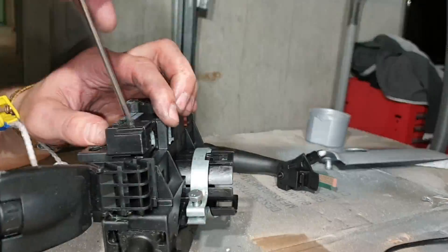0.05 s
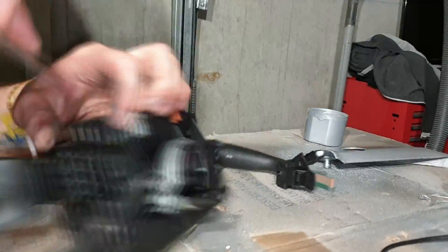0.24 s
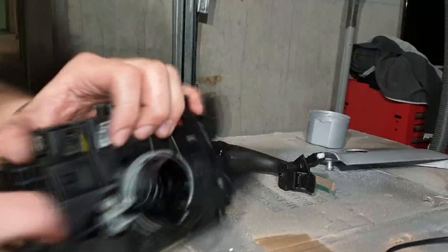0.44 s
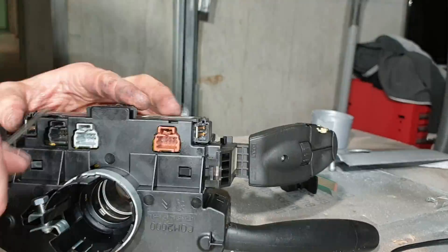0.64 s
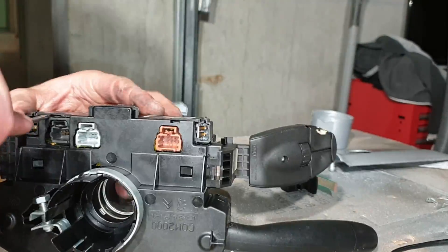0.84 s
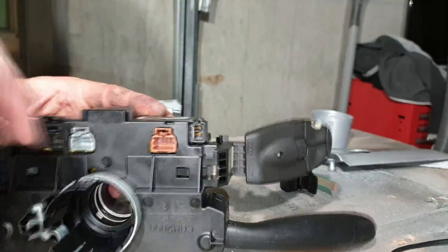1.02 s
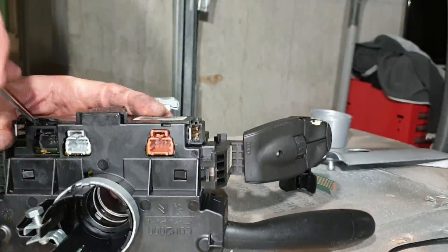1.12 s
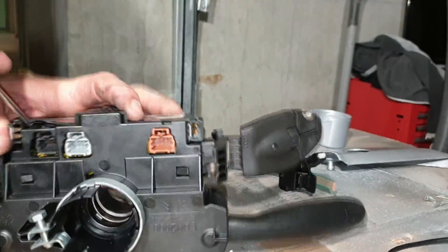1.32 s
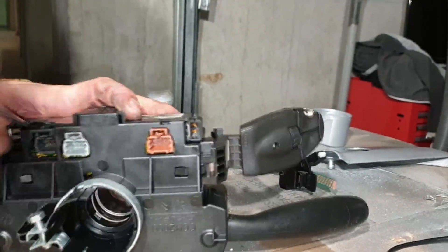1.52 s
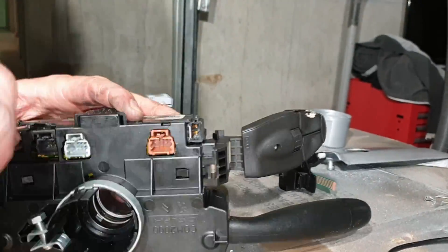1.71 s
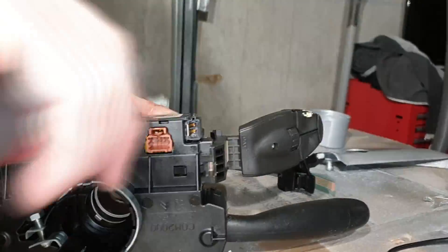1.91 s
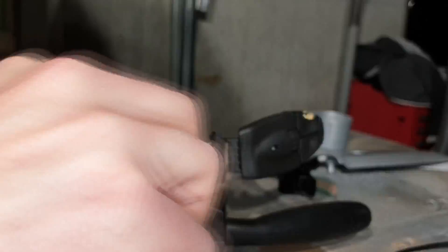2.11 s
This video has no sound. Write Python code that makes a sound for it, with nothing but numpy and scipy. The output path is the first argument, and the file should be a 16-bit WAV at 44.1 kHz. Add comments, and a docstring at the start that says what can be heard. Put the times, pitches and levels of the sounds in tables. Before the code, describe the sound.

A hollow plastic housing clicks and scrapes, first sliding across a workbench with a brief squeak, then snapping in two sharp clusters as a screwdriver pries its clips. A dull knock follows, close by in a small, quiet garage.

```python
"""In a small, quiet garage, a plastic switch housing is dragged round a workbench and pried open.
A screwdriver blade scrapes and slips, and the clips snap and make the hollow housing ring.
Sliding plastic hisses and sings, the housing bumps on the bench, and a dull knock comes near the end.
The work is close by and a little to the left of two microphones."""
import sys
import numpy as np
from scipy import signal
from scipy.fft import rfft
from scipy.io import wavfile
from scipy.ndimage import uniform_filter1d

SR = 44100
rng = np.random.default_rng(int(sys.argv[2]) if len(sys.argv) > 2 else 0)


def file_out(sig):
    """Save sig as 16-bit WAV at sys.argv[1]."""
    # one column per channel
    cols = np.atleast_2d(sig).T
    # limit, then scale
    lim = np.clip(cols, -1, 1)
    pcm = np.round(lim * 32767).astype(np.int16)
    wavfile.write(sys.argv[1], SR, pcm)


N = 94815
TOP_HZ = 16300

# The notes the housing rings at: (pitch [Hz], relative level [dB], time to fade by 60 dB [s])
HOUSING_NOTES = [(744, -12.5, 0.058), (867.4, -9, 0.052), (988.5, -11, 0.078), (1065, 5, 0.024),
                 (1203, -18.5, 0.11), (1826, -9.5, 0.049), (2080, -18, 0.087), (2440, 4, 0.0049),
                 (2720, -25.5, 0.15), (3070, -15, 0.065), (3340, -13.5, 0.073), (4970, 0, 0.021),
                 (7020, 9.5, 0.013)]
# Borders between a click's thud, body, snap and crack, low to high: (frequency [Hz])
CLICK_BORDERS = [697, 1797, 3600]
def click(body_db, snap_db, crack_db, thud_db):
    """One contact: a sharp crack, a short rattle and the ring of the hollow housing."""
    t = np.arange(SR // 6) / SR
    crack_s, rattle_s = 0.009, 0.082
    burst = stereo_noise(len(t)) * (gain(9 - 60 * t / crack_s) + gain(-3 - 60 * t / rattle_s))
    ring = 0
    for hz, db, fade_s in HOUSING_NOTES:
        pitch = hz * (1 + 0.0052 * rng.standard_normal())
        phase = 0.97 * rng.standard_normal((2, 1))
        ring += gain(db - 60 * t / fade_s) * np.sin(2 * np.pi * pitch * t + phase)
    # Light touches build more slowly; weak cracks are duller and ring half as much.
    rise_s = 0.003 * min(gain(-57 - max(body_db, snap_db)), 2)
    top, ring_share = (TOP_HZ, 1) if crack_db > -55 else (7500, 0.5)
    contact = (burst + ring_share * ring) * np.minimum(t / rise_s, 1)
    edges = [360, *CLICK_BORDERS, top]
    out = 0
    for k, db in enumerate([thud_db, body_db, snap_db, crack_db]):
        band_filter = signal.butter(4, edges[k:k + 2], "bandpass", fs=SR, output="sos")
        band = signal.sosfilt(band_filter, contact)
        opening_level = np.sqrt(np.mean(band[:, :SR // 100] ** 2, 1, keepdims=True))
        out += gain(db) * band / opening_level
    return gain(-7.5) * out


# Clicks, with relative levels: (time [s], body [dB], snap [dB], crack [dB], thud [dB])
CLIP_CLICKS = [(0.022, -57.5, -64, -72.5, -67), (.084, -76, -55.5, -62, -70.5),
               (0.289, -36, -40.5, -52, -62), (0.327, -33, -60, -52, -77), (0.533, -33.5, -61, -45, -73),
               (0.5812, -22, -57, -40, -66), (0.76, -56, -55, -57.5, -66), (1.0805, -38, -60, -60, -43.5),
               (1.094, -42, -36.5, -42, -59), (1.130, -40, -45.5, -52.5, -60), (1.1459, -39, -41, -58, -71),
               (1.1618, -22.5, -25.5, -31, -43), (1.1778, -32, -31, -35.5, -46),
               (1.3931, -35, -51, -61, -53), (1.437, -68, -52, -67, -64), (1.539, -56.5, -62, -67.5, -72),
               (1.629, -50.5, -59.5, -63, -65), (1.8109, -40, -41.5, -52, -60),
               (1.826, -27.5, -23.5, -48, -42.5), (1.8281, -28, -25.5, -33, -38),
               (1.856, -42.5, -54.5, -76, -60.5), (1.980, -57, -62, -61.5, -51.5),
               (1.996, -51, -53, -55.5, -53), (2.048, -60, -59, -58.5, -62),
               (2.124, -59.5, -69, -92, -67.5)]
def clips():
    """The clips snap and the housing ticks and knocks."""
    out = np.zeros((2, N))
    for time, *levels in CLIP_CLICKS:
        add(out, time, click(*levels))
    return out


# The tone of sliding hiss, hollow housing and bench rumble: (frequency [Hz], relative level [dB])
SLIDE_TONE = [(300, -5), (1200, -7), (2400, 3), (4000, 0.5), (5500, -2), (7000, -1.5), (8500, -6),
              (13000, -5.5), (16000, -10)]
HOUSING_TONE = [(60, -8), (200, -4.5), (450, -9.5), (720, -10), (870, -2), (1000, -0.5), (1180, -3.5),
                (1400, -5.5), (1900, -7.5), (3000, -15), (8000, -69)]
RUMBLE_TONE = [(15, -29), (35, -29.5), (62, -2), (90, -1), (145, 0), (210, -9.5), (400, -15.5),
               (1000, -38.5)]
# Shoves, with relative levels:
# (peak time [s], rise [s], fade [s], hiss [dB], housing [dB], rumble [dB])
BENCH_SHOVES = [(0.245, 0.013, 0.018, -35.5, -55.5, -49.5), (0.321, 0.036, 0.026, -38, -41, -51.5),
                (0.391, 0.042, 0.023, -55.5, -56, -55), (.444, 0.013, 0.032, -58, -61, -54.5),
                (0.488, 0.01, 0.05, -50, -52.5, -59.5), (0.566, 0.027, 0.03, -42, -40, -36.5),
                (0.635, 0.019, 0.024, -56.5, -76, -80)]
def drag():
    """The housing slides on the bench; each shove gathers speed and dies away."""
    out = 0
    for k, (tone, db) in enumerate([(SLIDE_TONE, -0.5), (HOUSING_TONE, 2.5), (RUMBLE_TONE, -2.5)]):
        push = sum(gain(db + dbs[k]) * swell(peak, rise, fade) for peak, rise, fade, *dbs in BENCH_SHOVES)
        out += friction(tone) * push
    return out


# The tone of a scrape's hiss and of its chatter: (frequency [Hz], relative level [dB])
SCRAPE_TONE = [(500, 5), (2000, -8), (4500, 4.5), (6700, 4.5), (8500, -2.5), (11500, -0.5), (16000, -7)]
CHATTER_TONE = [(500, -22), (1500, -40.5), (2500, -3.5), (2950, 6), (3350, -7), (4000, -15), (8000, -36)]
# Strokes on the plastic: (start [s], length [s], hiss [dB], chatter [dB], housing [dB])
SCRAPE_STROKES = [(0.61, 0.21, -71.5, -76, -68), (0.929, 0.14, -74, -85, -72.5),
                  (1.059, 0.036, -55, -54.5, -55), (1.092, 0.024, -48, -53, -55),
                  (1.132, 0.02, -53, -52, -50), (1.234, 0.024, -61, -49.5, -57.5),
                  (1.243, 0.064, -70, -105, -65), (1.363, 0.071, -63, -66, -58.5),
                  (1.432, 0.034, -56, -50, -61), (1.574, 0.064, -63.5, -56, -63),
                  (1.688, 0.072, -69, -101, -88.5), (1.691, 0.025, -66.5, -66, -54.5),
                  (1.76, 0.028, -65, -78, -59.5), (1.806, 0.034, -49.5, -46, -49)]
def scrapes():
    """Blade and fingers scrape the plastic: it hisses, chatters near 3 kHz and sounds hollow."""
    out = 0
    for k, tone in enumerate([SCRAPE_TONE, CHATTER_TONE, HOUSING_TONE]):
        pressure = sum(gain(dbs[k]) * stroke(start, length) for start, length, *dbs in SCRAPE_STROKES)
        out += friction(tone) * pressure
    return out


# Rough pitched sounds: (start [s], length [s], level [dB], pitch [Hz])
ROUGH_NOTES = [(0.029, 0.19, -78, 6040), (.548, 0.06, -40, 1210), (0.593, 0.049, -52.5, 1010),
               (0.647, 0.13, -71.5, 4520), (0.746, 0.057, -52.5, 970), (0.967, 0.064, -58.5, 1050),
               (1.976, 0.053, -53, 298), (1.982, 0.061, -60, 690)]
def rubs_and_knock():
    """Rough, fluttering notes: plastic rubs that sing, and a dull, low knock near the end."""
    hz = np.fft.rfftfreq(N, 1 / SR)
    flutter_db, flutter_s = 2.5, 0.006
    out = 0
    for start, length, db, pitch in ROUGH_NOTES:
        spread_hz = 190 * np.sqrt(pitch / 1000)
        resonance = 1 / (1 + ((hz - pitch) / spread_hz) ** 2)
        note = np.fft.irfft(rfft(stereo_noise(N)) * resonance, N)
        wobble = uniform_filter1d(rng.standard_normal(N), round(flutter_s * SR))
        flutter = gain(flutter_db * normalise(wobble))
        out += gain(db) * stroke(start, length) * normalise(note * flutter)
    return out


# Pushes against the bench: (start [s], length [s], level [dB])
BENCH_PUSHES = [(1.078, 0.06, -59), (1.15, 0.036, -49), (1.375, 0.049, -51), (1.546, 0.348, -70),
                (1.975, 0.39, -67)]
def bumps():
    """Each push rocks the housing on the bench with a low rumble."""
    pressure = sum(gain(db) * stroke(start, length) for start, length, db in BENCH_PUSHES)
    return friction(RUMBLE_TONE) * pressure


# Deep thumps on the bench: (time [s], level [dB])
TIPPING_THUMPS = [(0.233, -42.5), (.412, -50.5), (.657, -58), (1.053, -52), (1.088, -49.5), (1.441, -56)]
def thumps():
    """The housing tips and settles: a few deep swings that build and die."""
    rock_hz, rise_s = 57, 0.011
    t = np.arange(SR // 4) / SR
    swing = t / rise_s * np.exp(1 - t / rise_s) * np.sin(2 * np.pi * rock_hz * t)
    out = np.zeros((2, N))
    for time, db in TIPPING_THUMPS:
        add(out, time, gain(db) * swing[None])
    return out


# How long the garage echoes: (frequency [Hz], time to fade by 60 dB [s])
ECHO_FADE = [(150, 0.75), (2500, 0.33), (15000, 0.04)]
def garage_echo(work):
    """The room adds a faint, short echo whose high notes die first."""
    hz, t, noise = signal.stft(rng.standard_normal((2, SR // 2)), SR, nperseg=256)
    fade = gain(-60 * t / look_up(ECHO_FADE, hz)[:, None])
    tail = signal.istft(noise * fade, SR, nperseg=256)[1]
    return gain(-36.5) * signal.fftconvolve(work, tail / np.linalg.norm(tail[0]), axes=1)[:, :N]


# The tone of the quiet garage: (frequency [Hz], relative level [dB])
BACKGROUND_TONE = [(15, -11), (60, -3), (130, -5.5), (400, -21.5), (750, -18), (1000, -20.5), (1600, -21),
                   (2300, -22), (4000, -27), (6500, -28), (8200, -38.5), (12000, -29), (16000, -31.5)]
def background():
    """A very faint, low, steady rush fills the room."""
    return gain(-73.5) * apply_tone(stereo_noise(N), BACKGROUND_TONE)


def friction(tone):
    """Rubbing noise: thousands of tiny, uneven slips on top of a smooth hiss."""
    slips_per_s = 3000
    slips = (rng.random(N) < slips_per_s / SR) * gain(2 * np.minimum(rng.exponential(1, N), 4))
    return apply_tone(stereo_noise(N, normalise(slips) + 1), tone)


def stroke(start, length):
    """Loudness rises quickly, holds and lets go."""
    rise_s, fall_s = 0.017, 0.014
    t = np.arange(N) / SR - start
    return np.clip(t / rise_s, 0, 1) * np.exp(-np.maximum(t - length + fall_s, 0) / fall_s)


def swell(peak, rise, fade):
    """A smooth hump of loudness around the peak time."""
    t = np.arange(N) / SR - peak
    return np.exp(-(t / np.where(t < 0, rise, fade)) ** 2)


# How alike left and right are: (frequency [Hz], likeness [0 to 1])
STEREO_LIKENESS = [(100, 0.9), (1000, 0.76), (3000, 0.16), (6000, 0.14), (15000, 1)]
def stereo_noise(size, strength=1):
    """Noise that is partly the same on the left and the right."""
    left, other = rfft(rng.standard_normal((2, size)) * strength)
    same = look_up(STEREO_LIKENESS, np.fft.rfftfreq(size, 1 / SR))
    return np.fft.irfft([left, same * left + np.sqrt(1 - same ** 2) * other], size)


def gain(db):
    """Turns decibels into a multiplier."""
    return 10 ** (np.asarray(db) / 20)


def normalise(x):
    """Scales a signal to an average power of 1."""
    return x / np.sqrt(np.mean(x ** 2) + 1e-20)


def look_up(table, hz):
    """Reads between a table's rows, on a musical pitch scale."""
    row_hz, values = np.transpose(table)
    return np.interp(np.log(hz + 1), np.log(row_hz + 1), values)


def apply_tone(x, tone):
    """Filters a sound by a tone table and normalises it."""
    curve = gain(look_up(tone, np.fft.rfftfreq(N, 1 / SR)))
    return normalise(np.fft.irfft(rfft(x) * curve, N))


def add(mix, time, sound):
    """Mixes a sound in at a time in seconds."""
    part = mix[:, round(time * SR):][:, :sound.shape[1]]
    part += sound[:, :part.shape[1]]


# How much louder the left microphone hears the work: (frequency [Hz], left minus right [dB])
LEFT_BOOST = [(100, 0), (280, 1.5), (700, 5.6), (1400, 6), (2800, 4.2), (5600, 4.5), (14000, 8)]
def scene():
    """The work reaches the left microphone first and louder; echo and background surround it."""
    work = clips() + drag() + scrapes() + rubs_and_knock() + bumps() + thumps()
    hz = np.fft.rfftfreq(N, 1 / SR)
    right_delay_s = 0.00018
    left = gain(look_up(LEFT_BOOST, hz) / 2)
    right = np.exp(-2j * np.pi * hz * right_delay_s) / left
    direct = np.fft.irfft(rfft(work) * [left, right], N)
    return direct + garage_echo(work) + background()


def record(dry):
    """Cuts off the very highest treble."""
    low_pass = signal.firwin(401, TOP_HZ, window=("kaiser", 8), fs=SR)
    return signal.oaconvolve(dry, low_pass[None], "same")


dry = scene()
out = record(dry)
file_out(out)
```